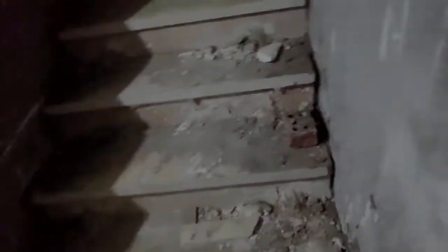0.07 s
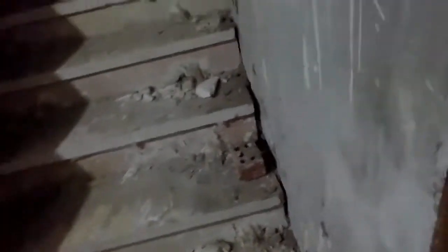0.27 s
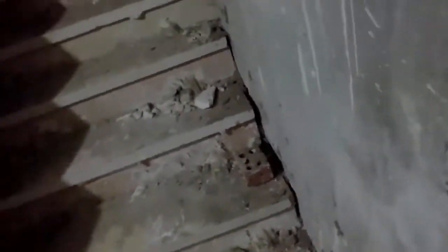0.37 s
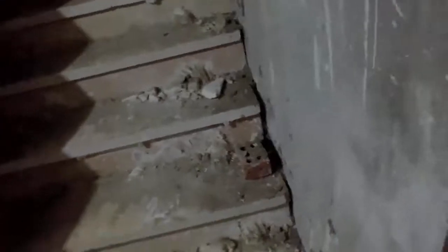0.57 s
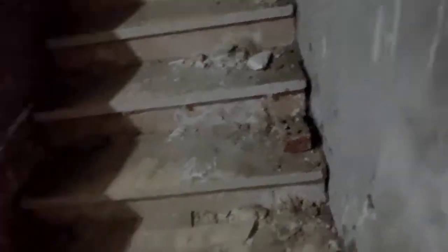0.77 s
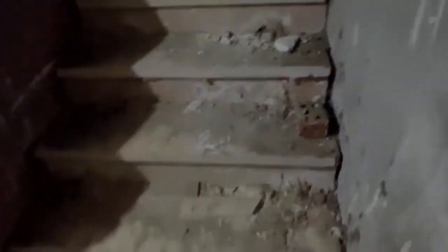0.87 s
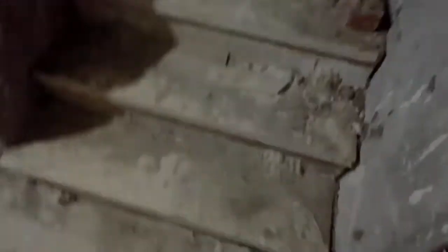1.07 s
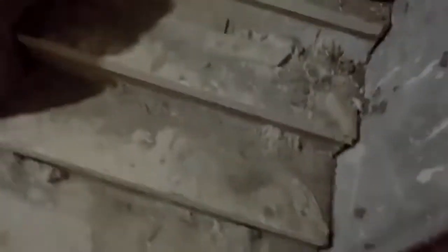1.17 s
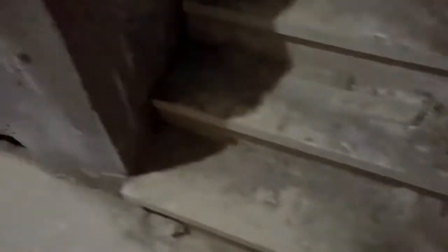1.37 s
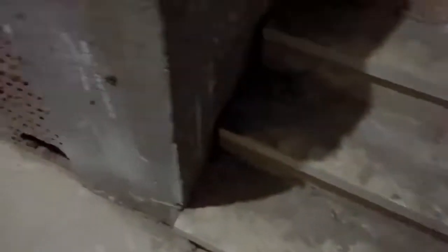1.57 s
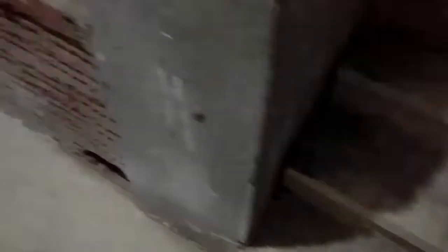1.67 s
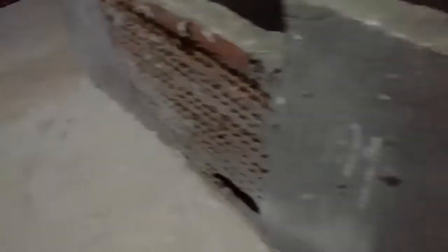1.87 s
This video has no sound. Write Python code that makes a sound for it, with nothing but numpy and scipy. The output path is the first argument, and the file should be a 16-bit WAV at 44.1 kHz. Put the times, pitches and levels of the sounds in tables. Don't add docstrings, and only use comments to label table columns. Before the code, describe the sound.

A wooden door slams hard in a concrete stairwell, booming and clattering, then cloth rustles faintly

```python
import sys
import numpy as np
from scipy import signal
from scipy.fft import rfft, irfft
from scipy.io import wavfile
from scipy.ndimage import uniform_filter1d

SR = 44100
rng = np.random.default_rng(int(sys.argv[2]) if len(sys.argv) > 2 else 0)


def wav_out(sig):
    wavfile.write(sys.argv[1], SR, np.round(np.clip(np.atleast_2d(sig).T, -1, 1) * 32767).astype(np.int16))


def convert_level_to_amplitude(level_db):
    exponent = np.asarray(level_db, float) / 20
    return 10 ** exponent


N = 85995


def evened(x):
    return x / np.sqrt(np.mean(x ** 2) + 1e-30)


def read(points, hz):
    f, value = np.transpose(points)
    return np.interp(np.log(hz + 1), np.log(f + 1), value)


def add(mix, s, sound):
    part = mix[round(s * SR):][:len(sound)]
    part += sound[:len(part)]


def coloured(x, points):
    gain = convert_level_to_amplitude(read(points, np.fft.rfftfreq(x.shape[-1], 1 / SR)))
    return irfft(rfft(x) * gain, x.shape[-1])


def ring(modes, length=1.8, rise_s=.0001):
    t = np.arange(0, length, 1 / SR)
    total = sum(convert_level_to_amplitude(db - 60 * t / t60) * np.sin(2 * np.pi * hz * t) for hz, db, t60 in modes)
    return (1 - np.exp(-t / rise_s)) * total


def whine(hz, width, db):
    pole = np.exp(-np.pi * width / SR)
    noise = rng.standard_normal(N) + 1j * rng.standard_normal(N)
    slow = signal.lfilter([1], [1, -pole], noise)
    carrier = np.exp(2j * np.pi * hz * np.arange(N) / SR)
    return convert_level_to_amplitude(db) * evened((slow * carrier).real)


# f/Hz, coherence [0-1]
LIKENESS = [(100, 1.), (250, 0.93), (600, 0.5), (1300, 0.6), (3500, 0.35), (9000, 0.35)]
LAG_S, LAG_FROM_HZ = .00059, 220


def ports(a, b, lean):
    hz = np.fft.rfftfreq(N, 1 / SR)
    same = np.clip(read(LIKENESS, hz), 0, 1)
    tilt = convert_level_to_amplitude(read(lean, hz) / 2)
    lag_s = LAG_S * hz ** 2 / (hz ** 2 + LAG_FROM_HZ ** 2)
    delayed = rfft(a) * np.exp(-2j * np.pi * hz * lag_s)
    right = same * delayed + np.sqrt(1 - same ** 2) * rfft(b)
    return irfft(np.array([rfft(a) * tilt, right / tilt]), N)


# f/Hz, t60/s
SHAFT_DECAY = [(120, 0.76), (250, 0.38), (500, 0.47), (1000, 0.53), (1900, 0.4423), (4500, 0.34),
               (9000, 0.29), (14000, 0.29)]
# f/Hz, left over right level/dB
ROOM_LEAN = [(60, 0), (380, -.5), (700, 0), (2400, 1), (4400, 5.5), (8100, 7.5), (15000, 6)]
SWAP_HZ = 9


def shaft(x, wet_db):
    taps = np.zeros((3, 2, SR))
    at = np.arange(100, SR - 20, 20) + rng.integers(0, 20, (3, 2, (SR - 101) // 20))
    np.put_along_axis(taps, at, rng.choice([-1., 1.], at.shape), 2)
    hz, t, bands = signal.stft(taps, SR, nperseg=256)
    decay = convert_level_to_amplitude(-60 * t / read(SHAFT_DECAY, hz)[:, None])
    tail = signal.istft(bands * decay, SR, nperseg=256)[1]
    tail *= convert_level_to_amplitude(wet_db) / np.linalg.norm(tail[0, 0])
    cycles = SWAP_HZ * np.arange(N) / SR + np.arange(3)[:, None] / 3
    turns = np.sqrt(2 / 3) * np.cos(2 * np.pi * cycles)
    wet = signal.fftconvolve((x[0] * turns)[:, None], tail, axes=2)[..., :N].sum(0)
    near = rng.standard_normal(300) * np.exp(-np.arange(300) / 60)
    other = signal.fftconvolve(x[1], near / np.linalg.norm(near))[:N]
    return ports(x[0] + wet[0], other + wet[1], ROOM_LEAN)


# f/Hz, density/dB
AIR_SPECTRUM = [(12, -33), (20, 4), (52, -11), (80, -8.5), (103, -29), (144, -12.5), (382, -50.5), (1160, -56),
                (15500, -78)]
AIR_DB = -66


def air():
    noise = evened(coloured(rng.standard_normal((2, N)), AIR_SPECTRUM))
    return ports(*convert_level_to_amplitude(AIR_DB) * noise, ROOM_LEAN)


# f/Hz, rms level/dB
HUM_PARTIALS = [(35.3, -73), (70.5, -72), (141, -85)]


def hum():
    t = np.arange(N) / SR
    return sum(np.sqrt(2) * convert_level_to_amplitude(db) * np.sin(2 * np.pi * (hz * t + rng.random())) for hz, db in HUM_PARTIALS)


# f/Hz, width/Hz, level/dB
HINGE_BANDS = [(50, 51, -63), (140, 150, -65.5), (318, 42, -59), (1780, 32, -74.5), (5510, 180, -70)]


def hinge():
    swinging = np.clip((.24 - np.arange(N) / SR) / 0.067, 0, 1)
    return sum(whine(*row) for row in HINGE_BANDS) * swinging


# t/s, level/dB
CLOTH_EFFORT = [
    (0.0, -58), (0.118, -53.5), (0.146, -44), (0.176, -41.5),
    (.2, -67.5), (.45, -96),
    (0.9, -83), (0.916, -85), (0.928, -78), (1.168, -92.5), (1.206, -72), (1.452, -51.5), (1.482, -58),
    (1.852, -65), (1.95, -66)]
# f/Hz, density/dB
CLOTH_SPECTRUM = [(250, -28.5), (600, 0.5), (1200, -1.5), (2200, -2.5), (5000, -5), (9500, -9.5),
                  (12500, -11.5), (15500, -17.5)]
# f/Hz, left over right level/dB
BODY_LEAN = [(60, -3), (180, 2.5), (550, 5), (1650, 0.5), (4970, 11), (15000, 13.5)]
# t/s, level/dB, f/Hz
SEAM_SNAPS = [(1.2565, -61, 9500), (1.263, -63, 6470), (1.293, -60, 4162), (1.3075, -54, 9500),
              (1.379, -61, 6400), (1.449, -57, 4000), (1.862, -62.5, 6950)]


def cloth():
    s, db = np.transpose(CLOTH_EFFORT)
    t = np.arange(N) / SR
    flicker = evened(uniform_filter1d(rng.standard_normal(N), size=500))
    effort = convert_level_to_amplitude(np.interp(t, s, db) + 1.5 * flicker - 3.0)
    grains = rng.standard_normal((2, N)) * convert_level_to_amplitude(0.51 * np.minimum(rng.exponential(1, (2, N)), 6))
    rub = evened(coloured(grains, CLOTH_SPECTRUM)) * effort
    u = t[:300]
    for s, db, hz in SEAM_SNAPS:
        hiss = evened(coloured(rng.standard_normal(len(u)), CLOTH_SPECTRUM))
        tone = 0.86 * np.sin(2 * np.pi * hz * u) + .6 * hiss
        add(rub[0], s, convert_level_to_amplitude(db) * tone * u / 0.00046 * np.exp(-u / 0.001))
    return ports(*rub, BODY_LEAN)


# t/s, level/dB, f/Hz
FOOTFALLS = [
    (0.12, -57, 46.7),
    (0.905, -45, 144.8),
    (1.009, -47, 39.76),
    (1.091, -42.5, 34.2),
    (1.188, -59.5, 36),
    (1.691, -60.5, 35.32),
]


def footsteps():
    out = np.zeros(N)
    for s, db, hz in FOOTFALLS:
        add(out, s, ring([(hz, db, .3), (hz * 0.93, db - 2.0, .2)], .4, 0.024))
    return out


# t/s, thud level/dB, knock level/dB, crack level/dB, crack length/s
LEAF_BLOWS = [(0.185, -48, -31.5, -19.5, 0.0094), (0.196, -31.5, -23, -17, 0.025),
              (0.211, -32.5, -23.5, -19, 0.012), (0.226, -18, -10.5, -9.5, 0.0048),
              (0.2666, -10, -20, -12, .01), (0.277, -32.5, -22.5, -20, 0.008),
              (.2855, -12.5, -35.5, -26, .008), (0.293, -16, -30, -24, 0.0075),
              (0.318, -16.5, -8, -34.5, .006), (0.33, -25, -29.5, -33, 0.0092),
              (.352, -29.5, -26.5, -41, 0.0067), (0.3868, -17, -29.5, -47.5, .008)]
PUSH_S, REBOUND_S = 0.002696, .29
SEAT_S, SHUDDER_DB, SHUDDER_S = .275, -59, 0.055


def push():
    out, t = np.zeros(N), np.arange(0, .06, 1 / SR)
    bump = np.sin(np.pi * np.minimum(t / PUSH_S, 1)) ** 2
    for s, thud_db, _, _, _ in LEAF_BLOWS:
        add(out, s, np.sign(s - REBOUND_S) * convert_level_to_amplitude(thud_db) * bump / bump.sum())
    after = np.arange(N) / SR - SEAT_S
    rattle = evened(uniform_filter1d(rng.standard_normal(N), size=40))
    return out + convert_level_to_amplitude(SHUDDER_DB) * rattle * (after > 0) * np.exp(-abs(after) / SHUDDER_S)


# f/Hz, level/dB, t60/s
BOOM_MODES = [(36, -16, 0.31), (89.8, -16, 0.6), (99.1, -23, 0.89), (144, -19, 0.7), (161.08, -3, 0.45),
              (203, -18, 0.7), (227.4, -13, 0.54), (265.1, -10, 0.45), (326.6, -16, 0.35)]
FLEX_S, FLEX_LENGTH_S, FLEX_HZ, FLEX_DB = .198, 0.05, 161, -7.5
WELL_S, WELL_HZ, WELL_DB, WELL_RISE_S, WELL_T60 = 0.28, 55.6, -7, 0.018, 0.71


def boom(force):
    out = signal.fftconvolve(force, ring(BOOM_MODES))[:N]
    u = np.arange(0, 1, 1 / (SR * FLEX_LENGTH_S))
    bend = np.sin(np.pi * u ** 1.5) ** 2
    add(out, FLEX_S, convert_level_to_amplitude(FLEX_DB) * bend * np.sin(2 * np.pi * FLEX_HZ * FLEX_LENGTH_S * u))
    add(out, WELL_S, -ring([(WELL_HZ, WELL_DB, WELL_T60)], rise_s=WELL_RISE_S))
    return out


# f/Hz, level/dB, t60/s
PANEL_MODES = [(110, -17, 0.086), (171.9, -4, 0.056), (265.7, -4.5, 0.058), (333.74, -5.5, .07),
               (411, -3.5, 0.056), (533, -3.5, 0.056), (596.3, -5.5, 0.043)]


def panels(force):
    return convert_level_to_amplitude(3.0) * signal.fftconvolve(force, ring(PANEL_MODES, .3))[:N]


# f/Hz, level/dB, t60/s
KNOCK_MODES = [(694, -9.5, 0.025), (883, 5, 0.0094), (1130, 4, 0.031), (1280, -6.5, 0.03), (1480, -7, 0.03),
               (1753, -11, 0.04), (2000, -10.5, 0.041), (2690, -15.5, 0.037)]
KNOCK_SPREAD = .03


def knock():
    out, t = np.zeros(N), np.arange(0, .06, 1 / SR)
    for s, _, knock_db, _, _ in LEAF_BLOWS:
        shift = [KNOCK_SPREAD, 0, 0] * rng.standard_normal((len(KNOCK_MODES), 3))
        modes = np.array(KNOCK_MODES) * (1 + shift)
        burst = convert_level_to_amplitude(knock_db - 25.0) * rng.standard_normal(len(t)) * np.exp(-t / 0.0046)
        add(out, s, signal.fftconvolve(burst, ring(modes, .1)))
    return out


# f/Hz, density/dB
CRACK_SPECTRUM = [(250, -35), (450, -5), (750, -7), (1050, -4.5), (1900, -13.5), (2600, -13.5),
                  (6000, -25.5), (15500, -52)]


def crack():
    level, t = np.zeros(N), np.arange(0, .06, 1 / SR)
    for s, _, _, crack_db, length in LEAF_BLOWS:
        add(level, s, convert_level_to_amplitude(crack_db + 0.5) * (1 - np.exp(-t / 0.002)) * np.exp(-t / length))
    grains = rng.standard_normal((2, N)) * convert_level_to_amplitude(2.7 * rng.exponential(1, N))
    return level * evened(coloured(grains, CRACK_SPECTRUM))


# t/s, level/dB, length/s
BOLT_SCRAPES = [(.1965, -29, 0.0027), (.202, -27.5, .005), (.215, -31.5, .006), (.2275, -25.5, .005),
                (.236, -31, .008), (.2685, -29.5, .004), (.277, -36, 0.007), (.290, -36, .004),
                (.296, -34, .005), (.3195, -35.5, .006), (.331, -44, .005)]
# f/Hz, density/dB
METAL_SPECTRUM = [(1500, -33), (3500, -3), (7000, -5), (11000, -6.5), (15500, -11.5)]


def bolt():
    level, t = np.zeros(N), np.arange(0, .05, 1 / SR)
    for s, db, length in BOLT_SCRAPES:
        add(level, s, convert_level_to_amplitude(db) * (1 - np.exp(-t / 0.0002)) * np.exp(-t / length))
    grains = rng.standard_normal((2, N)) * convert_level_to_amplitude(2.8 * rng.exponential(1, N))
    return level * evened(coloured(grains, METAL_SPECTRUM))


# f/Hz, level/dB, t60/s
CASE_MODES = [(613, -11.5, .03), (1027, -8, 0.039), (1127, -8, .03), (1305, -5, 0.036), (1425, -6.5, 0.03),
              (1690, -16, .02), (2300, -20.5, 0.017)]
# t/s, level/dB, pitch factor [1]
CASE_HITS = [
    (0.2289, -6.5, 0.84),
    (.2675, -9, 0.91),
    (0.2729, -6.5, 0.83),
    (0.3186, -1.5, 0.96),
    (0.3463, -8, 0.68),
]


def lock_case():
    out = np.zeros(N)
    for s, db, factor in CASE_HITS:
        modes = np.array(CASE_MODES) * [factor, 1, 1]
        add(out, s, convert_level_to_amplitude(db) * ring(modes, 0.14, 0.00082))
    return out


CASE_LAG_S, CASE_ECHO_DB, SHAFT_DB = .0008, -12, -4


def slam():
    force = push()
    low = boom(force)
    clack = lock_case()
    wood = knock() + crack() + bolt() + panels(force)
    close = np.array([clack, convert_level_to_amplitude(-3.5) * np.roll(clack, round(CASE_LAG_S * SR))])
    echoing = shaft(wood + convert_level_to_amplitude(CASE_ECHO_DB) * clack, SHAFT_DB)
    return ports(low, np.roll(low, round(.004 * SR)), ROOM_LEAN) + close + echoing


# t/s, level/dB, low ring f/Hz, high ring f/Hz
LATCH_TICKS = [(0.4575, -35, 4290, 6700), (0.466, -34.5, 4063, 4790), (.483, -42.5, 2970, 5340),
               (0.503, -50.5, 2570, 3960), (0.53, -43.5, 4150, 6670), (0.599, -52.5, 3085, 4280),
               (.623, -69, 2873, 4030), (.65, -68, 2880, 3770), (0.849, -74.5, 1480, 2930),
               (0.932, -73.5, 1517, 3946), (.99, -77.5, 2000, 3707)]
# f/Hz, density/dB
TICK_SPECTRUM = [(600, -29.5), (1500, 1), (4000, -0.5), (7000, -6), (11000, -14), (15500, -29.5)]
TICK_S, TICK_NOISE, TICK_RING, TICK_SHAFT_DB = 0.001, 1.3, .6, -5.5


def latch():
    out, u = np.zeros(N), np.arange(600) / SR
    hiss = evened(coloured(rng.standard_normal((len(LATCH_TICKS), len(u))), TICK_SPECTRUM))
    pulse = u / TICK_S * np.exp(1 - u / TICK_S)
    for (s, db, low_hz, high_hz), noise in zip(LATCH_TICKS, hiss):
        rings = np.sin(2 * np.pi * low_hz * u) + np.sin(2 * np.pi * high_hz * u)
        add(out, s, convert_level_to_amplitude(db) * (TICK_RING * rings + TICK_NOISE * noise) * pulse)
    return shaft(np.array([out, out]), TICK_SHAFT_DB)


# t/s, level/dB
SOLE_DRAG = [(1.3, -77), (1.34, -79.5), (1.45, -58.5), (1.59, -67), (1.858, -65.5), (1.95, -74)]
# f/Hz, density/dB
SOLE_SPECTRUM = [(150, -25.5), (330, -8.5), (600, -7.5), (1000, -0.5), (1440, -4.5), (2500, -6),
                 (5000, -14), (10000, -32)]
SQUEAK_S, SQUEAK_LENGTH_S = 1.42, .25
SQUEAK_HZ, SQUEAK_WIDTH_HZ, SQUEAK_DB = 310, 15.5, -71


def scuff():
    t = np.arange(N) / SR
    s, db = np.transpose([(1.2, -87.5)] + list(SOLE_DRAG))
    grains = rng.standard_normal((2, N)) * convert_level_to_amplitude(0.72 * np.minimum(rng.exponential(1, (2, N)), 6))
    flicker = evened(uniform_filter1d(rng.standard_normal(N), size=900))
    drag = convert_level_to_amplitude(np.interp(t, s, db) + 1.5 * flicker + 5)
    swell = np.sin(np.pi * np.clip((t - SQUEAK_S) / SQUEAK_LENGTH_S, 0, 1))
    squeak = whine(SQUEAK_HZ, SQUEAK_WIDTH_HZ, SQUEAK_DB) * swell
    return squeak + ports(*evened(coloured(grains, SOLE_SPECTRUM)) * drag, BODY_LEAN)


DUCK_S, DUCK_DB, RELEASE_S, RECOVER_S = .183, 12.5, 0.37, 0.35


def scene():
    building = air() + hum() + hinge() + footsteps()
    return building + cloth() + convert_level_to_amplitude(DUCK_DB) * slam() + latch() + scuff()


def top_cut(x):
    return signal.sosfilt(signal.butter(12, 15790, fs=SR, output="sos"), x)


def record(dry):
    t = np.arange(N) / SR
    fall = np.clip((t - DUCK_S) / .002, 0, 1)
    recovery = np.clip(1 - (t - RELEASE_S) / RECOVER_S, 0, 1)
    bass_cut = signal.butter(2, 22, "high", fs=SR, output="sos")
    levelled = signal.sosfilt(bass_cut, dry) / convert_level_to_amplitude(DUCK_DB * fall * recovery)
    return top_cut(1.057 * np.tanh(levelled / 1.168))


dry = scene()
out = record(dry)
wav_out(out)
```